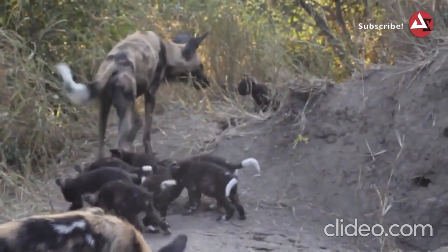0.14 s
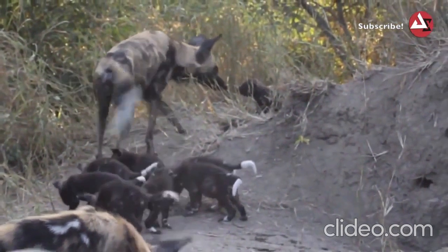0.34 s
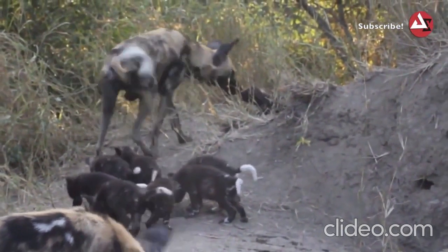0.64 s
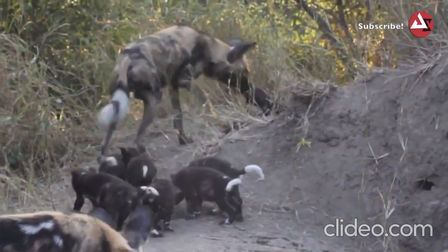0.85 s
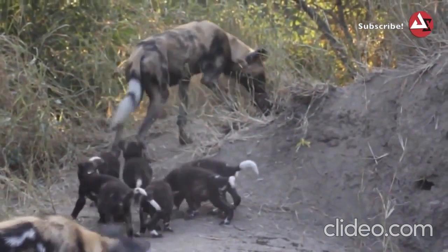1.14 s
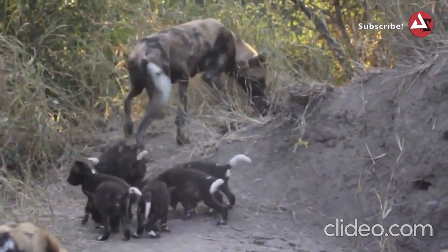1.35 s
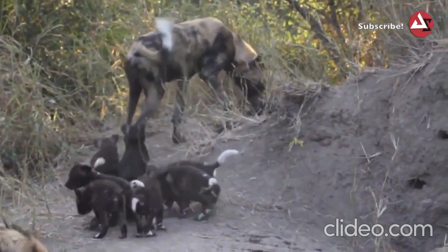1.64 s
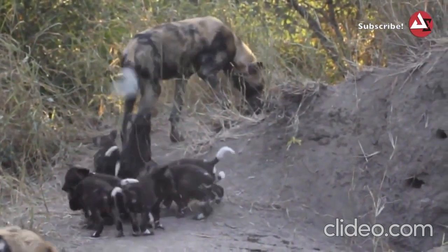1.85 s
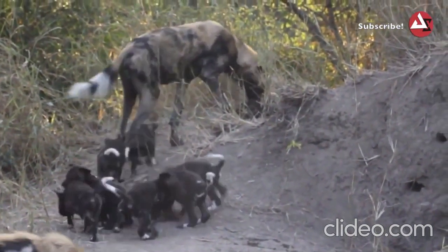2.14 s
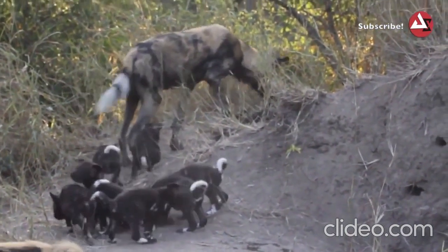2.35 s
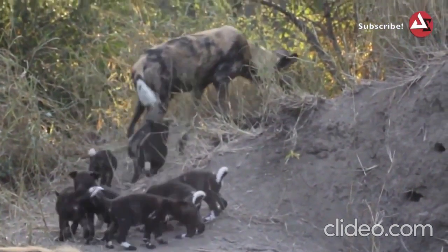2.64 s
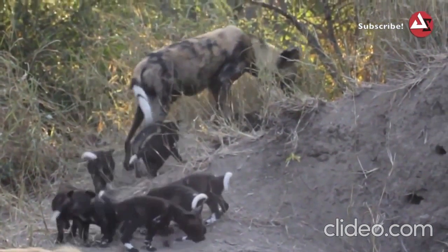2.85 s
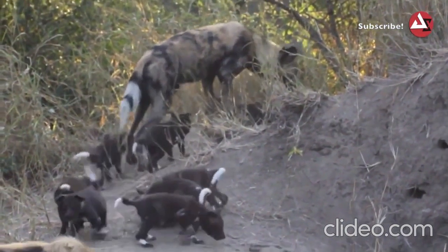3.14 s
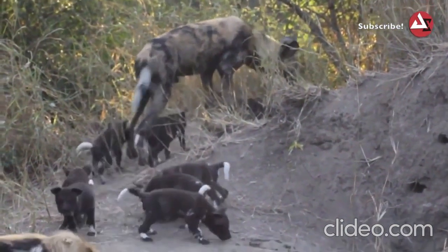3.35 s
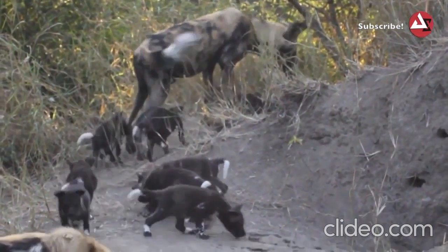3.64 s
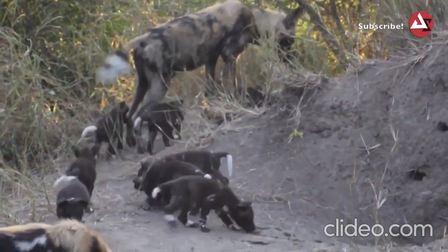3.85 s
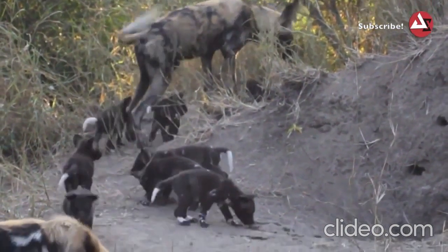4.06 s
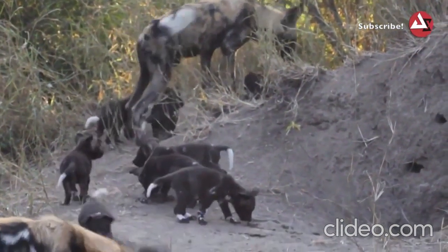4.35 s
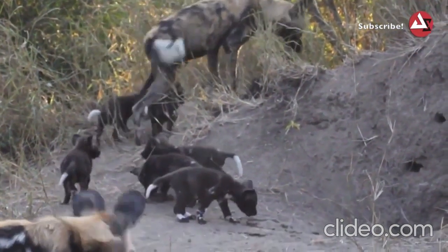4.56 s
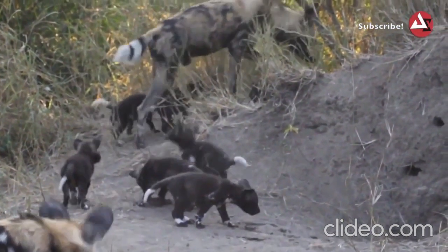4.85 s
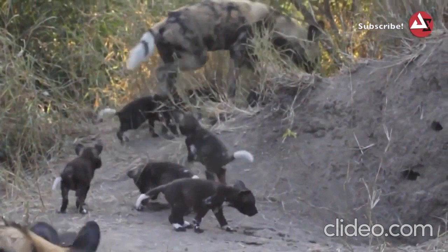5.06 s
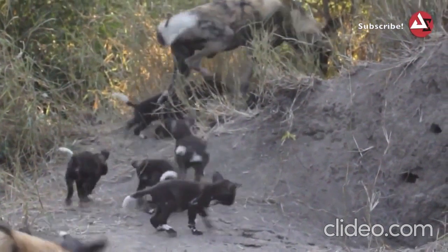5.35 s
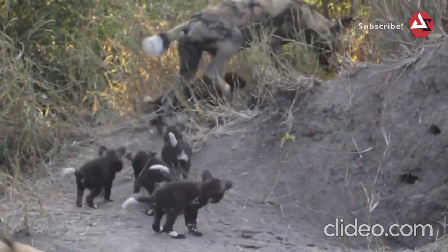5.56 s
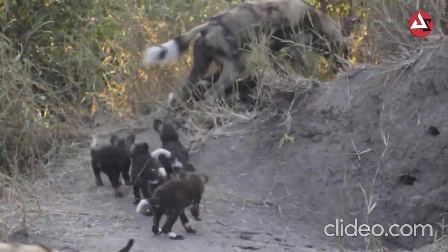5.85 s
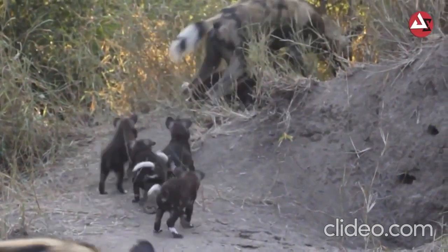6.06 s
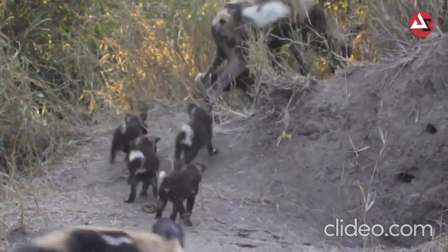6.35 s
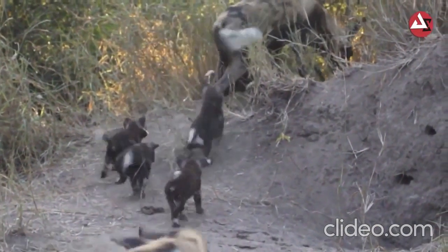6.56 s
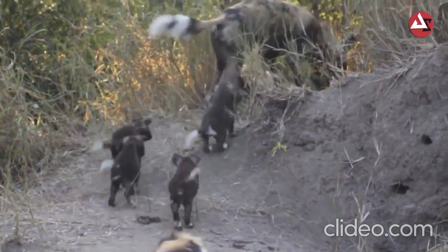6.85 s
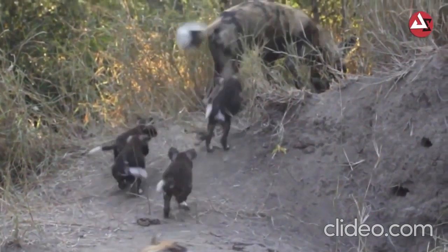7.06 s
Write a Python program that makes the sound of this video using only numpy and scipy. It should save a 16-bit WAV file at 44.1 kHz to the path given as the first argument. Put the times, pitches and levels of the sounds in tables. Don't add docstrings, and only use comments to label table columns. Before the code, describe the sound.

Bird-like squeaks and quick shrieks from pups echo briefly off an earth bank, among nearby shutter clacks, snapping twigs and soft rustling.

```python
import sys
import numpy as np
from scipy import signal
from scipy.fft import rfft, irfft, next_fast_len
from scipy.io import wavfile
from scipy.ndimage import uniform_filter1d, minimum_filter1d, map_coordinates

SR = 44100
rng = np.random.default_rng(int(sys.argv[2]) if len(sys.argv) > 2 else 0)


def invert_db(level):
    return 10 ** (np.asarray(level, dtype=float) / 20)


def store_pcm(level_fs):
    pcm = np.round(np.clip(level_fs, -1, 1) * 32767).astype(np.int16)
    wavfile.write(sys.argv[1], SR, np.atleast_2d(pcm).T)


N = 317828


def unit(x):
    return x / np.sqrt(np.mean(x ** 2) + 1e-20)


def along(points, hz):
    f, v = np.transpose(points)
    return np.interp(np.log(hz + 1), np.log(f + 1), v)


def wobble(n, rate):
    knots = rng.standard_normal(int(n * rate / SR) + 4)
    return map_coordinates(knots, [np.arange(n) * rate / SR])


def filtered(x, response):
    m = next_fast_len(x.shape[-1] + 8192)
    spectrum = rfft(x, m) * response(np.fft.rfftfreq(m, 1 / SR))
    return irfft(spectrum, m)[..., :x.shape[-1]]


def modes(table):
    def response(f):
        total = 0
        for k, (centre, width, db) in enumerate(table):
            total = total + (-1) ** k * invert_db(db) * 1j * f * width / (centre * centre - f * f + 1j * f * width)
        return total
    return response


def add(out, s, x):
    out[round(s * SR):][:len(x)] += x[:N - round(s * SR)]


def rush(spectrum, patchy_db, grit_db):
    gritty = rng.standard_normal(N) * invert_db(grit_db * wobble(N, 300))
    z = signal.stft(gritty, nperseg=512)[2]
    field = uniform_filter1d(rng.standard_normal(z.shape), 8, 0)
    field = uniform_filter1d(field, 14, 1)
    patchy = signal.istft(z * invert_db(patchy_db * unit(field)), nperseg=512)[1][:N]
    points = [(1, -120)] + list(spectrum) + [(22000, -120)]
    return unit(filtered(patchy, lambda hz: invert_db(along(points, hz))))


def arched(t, s, v):
    step = np.diff(v) / np.diff(s)
    inner = np.where(step[1:] * step[:-1] > 0, (step[1:] + step[:-1]) / 2, 0)
    slope = np.r_[step[0], inner, step[-1]]
    i = np.clip(np.searchsorted(s, t) - 1, 0, len(s) - 2)
    h = s[i + 1] - s[i]
    u = np.clip((t - s[i]) / h, 0, 1)
    ease = u * u * (3 - 2 * u)
    bend = h * u * (1 - u) * ((1 - u) * slope[i] - u * slope[i + 1])
    return v[i] + (v[i + 1] - v[i]) * ease + bend


def pitch_lines():
    # (time of the top [s], top pitch [Hz], length [s], level [dB], mouth opening [dB])
    twitters = [(0.541, 2824, 0.0496, -56.5, 6.5), (2.733, 2580, 0.083, -50, 5.5),
                (3.036, 2684, 0.095, -47.5, -6), (3.301, 2585, 0.0811, -43.5, -5),
                (6.483, 2706, 0.041, -44, 6)]
    # (pitch [Hz], level [dB])
    level_by_pitch = [(1300, -4), (1650, -3), (1950, 3.5), (2120, 1.5), (2290, -7), (2480, -1.5), (2700, 0)]
    # (time [s], pitch [Hz], level [dB])
    whines = [(-22, -45.5, [(0.205, 1650, -55), (0.215, 1643, -44), (0.242, 1680, -46), (0.275, 1283, -58),
              (0.31, 1217, -59.5), (0.42, 1166, -64), (0.49, 1000, -69)]), (-3, -40, [(2.04, 1560, -46),
              (2.07, 1595, -48), (2.09, 1766, -37.5), (2.11, 1930, -36.5), (2.14, 1720, -33.5),
              (2.17, 1715, -56)]), (-7.5, -21.5, [(2.085, 2104, -40), (2.105, 2395, -40.5),
              (2.15, 2170, -44.5)]), (13, -12, [(2.382, 1784, -48.5), (2.41, 1824, -48),
              (2.444, 1930, -51)]), (10.5, -2.5, [(3.777, 2470, -56), (3.782, 2480, -45.5),
              (3.795, 2397, -41), (3.803, 2170, -54)]), (14, -14, [(2.443, 2200, -58), (2.46, 2480, -60),
              (2.475, 2335, -59.5), (2.49, 2110, -55), (2.5, 2050, -64)]), (-15, -11, [(6.085, 1540, -64),
              (6.103, 1770, -48), (6.118, 2340, -61)])]
    # (time [s], pitch [Hz], level [dB], mouth opening [dB])
    yelps = [
        (-1, -20.5, -1, [(.718, 2100, -50, -8), (.727, 2107, -39.5, -5), (.734, 2243, -28, -10), (.741, 2342, -30, 0), (.757, 2477, -25, 2), (.775, 2297, -31, -2.5), (.794, 2160, -24, -8), (.81, 2116, -40.5, 6), (.895, 1987, -47.5, 0.5)]),
        (-5.5, -25, 0.5, [(1.705, 1597, -52, -7), (1.72, 1794, -36.5, -11), (1.735, 2105, -32.5, -2), (1.77, 1943, -34, 5), (1.79, 1950, -58, 2)]),
        (-30, -42, -6, [(3.62, 1760, -62.5, -7), (3.648, 1995, -51, -6), (3.654, 2190, -26.5, 9), (3.659, 2430, -16.5, 7), (3.663, 2500, -27.5, 7), (3.667, 2593, -11, -2), (3.677, 2614, -10.5, -2), (3.684, 2500, -17.5, 9), (3.688, 2380, -43.5, 12)]),
        (-4, -17, 1.5, [(3.688, 2365, -44.5, 7), (3.7, 1950, -41.5, 2), (3.712, 1497, -49.5, -8), (3.73, 1385, -45, 9), (3.748, 1550, -53, -8), (3.76, 2010, -39.5, -10), (3.776, 2400, -54, -5)]),
        (-2, -14, -3, [(3.803, 2100, -56, -8), (3.812, 1864, -38.5, -14), (3.822, 1710, -44, -9), (3.829, 1332, -47, -5), (3.86, 1235, -47, -1), (3.885, 1310, -48, 0), (3.906, 1402, -48, 1.5), (3.93, 1290, -48.5, -3), (3.957, 1160, -53, -12)]),
        (-1, -28, -2, [(4.372, 1650, -60, -23), (4.378, 1610, -38, -19), (4.394, 1630, -37.5, -9), (4.401, 1705, -32.5, 7), (4.405, 2190, -38.5, 10), (4.411, 2330, -34.5, 4.5), (4.424, 2490, -36.5, -6), (4.442, 2220, -40, -1), (4.46, 1980, -56, 6)]),
             (-7, -25, -4.5, [(1.962, 2290, -58, -12), (1.975, 2550, -44, -15), (1.99, 3020, -46, 2),
               (2.003, 2756, -26.5, 4.5), (2.015, 2364, -37.5, -5), (2.035, 2000, -63, 8)]),
               (-15, -19, 2, [(2.302, 1850, -59, -12), (2.311, 2184, -36, -1), (2.319, 2500, -28, -5),
               (2.333, 2848, -20, 0), (2.339, 2953, -32, 0), (2.348, 2853, -32, -3), (2.358, 2640, -26, 2),
               (2.366, 2400, -32, 8), (2.378, 1950, -46, 3)]), (-4, -25, -1, [(4.118, 1755, -61, 0),
               (4.128, 1904, -50, 0), (4.137, 1995, -43, 1), (4.147, 2360, -57, 3), (4.157, 2580, -41, -8),
               (4.17, 2316, -49, 4), (4.184, 1944, -57, 14), (4.198, 1680, -52.5, -12),
               (4.238, 1450, -60, -12)]), (-7, -30, 0.5, [(5.982, 2500, -54, 0), (6.002, 2780, -56.5, 3),
               (6.011, 2335, -49.5, -2), (6.018, 2120, -45, -3), (6.024, 1980, -61.5, 0)])]

    rise_share, round_top_s = 0.47, 0.0085
    for top_s, top_hz, length, db, mouth_db in twitters:
        u = np.arange(-rise_share * length, (1 - rise_share) * length, 1 / SR)
        sweep = np.where(u < 0, 36000, 48000)
        hz = top_hz - sweep * (np.hypot(u, round_top_s) - round_top_s)
        fade_db = 11 * np.linspace(-1, 1, len(u)) ** 4
        tiring_db = 87 * u
        level_db = db - fade_db - tiring_db + along(level_by_pitch, hz)
        yield top_s + u, hz, level_db, mouth_db, -21 + 0.568 * mouth_db, 0

    still = [(second_db, upper_db, 0, np.pad(rows, ((0, 0), (0, 1)))) for second_db, upper_db, rows in whines]
    for second_db, upper_db, echo_db, rows in still + yelps:
        s, pitch, db, mouth = np.transpose(rows)
        t = np.arange(round(s[0] * SR), round(s[-1] * SR)) / SR
        level_db = uniform_filter1d(np.interp(t, s, db), 120, mode="nearest")
        mouth_db = np.interp(t, s, mouth)
        yield t, arched(t, s, pitch), level_db, second_db + mouth_db, upper_db + mouth_db, echo_db


def chirps():
    # (frequency [Hz], level [dB])
    mouth = [(1200, 3), (1900, 2.5), (2300, -0.5), (2650, -1), (3000, -5)]
    # (frequency [Hz], level [dB])
    second = [(2400, -8.5), (2900, -5.5), (3450, -16), (3950, -8), (4350, -3.5), (4850, 1.2), (5400, -4),
              (6200, 2.5)]
    # (frequency [Hz], level [dB])
    throat = [(3500, -24), (4300, -12), (5300, 1), (7300, -2.5), (9000, -27), (11000, -23), (14000, -38)]
    # (frequency [Hz], density [dB per Hz])
    breath_colour = [(1500, -27), (2500, -3), (5000, 10), (9000, -15.5), (13000, 3.5)]

    out, toward_bank, effort = np.zeros((3, N))
    for t, hz, level_db, second_db, upper_db, echo_db in pitch_lines():
        n = len(t)
        weak = np.clip((-27.5 - level_db) / 12, 0, 1)
        level_db = level_db - 2 * weak * np.abs(wobble(n, 73.77)) ** 1.79
        first_db = level_db + along(mouth, hz)
        second_db = level_db + second_db + along(second, 2 * hz)
        cycles = np.cumsum(hz * (1 + 0.01037 * wobble(n, 401.0))) / SR
        glide = np.abs(np.gradient(hz) * SR)
        upper_db = level_db + upper_db - 0.00016 * glide
        levels = [first_db, second_db - 5e-5 * glide]
        levels += [upper_db + along(throat, k * hz) for k in range(3, 6)]
        voice = np.zeros(n)
        for k, db in enumerate(levels):
            flutter_db = (0.7 + 1.4 * weak + 1.0 * k) * wobble(n, 223)
            waver_db = 1.1 * k * wobble(n, 80.7)
            voice += invert_db(db + flutter_db + waver_db) * np.sin(2 * np.pi * (k + 1) * cycles)
        edge = np.clip(np.minimum(t - t[0], t[-1] - t) / 0.0028, 0, 1)
        add(out, t[0], np.sqrt(2) * edge * voice)
        add(toward_bank, t[0], invert_db(echo_db) * np.sqrt(2) * edge * voice)
        add(effort, t[0], edge * (invert_db(first_db) + invert_db(second_db)))
    breath = invert_db(-30) * effort * rush(breath_colour, patchy_db=4, grit_db=4)
    return out + breath, toward_bank + breath


def whistles():
    # (start [s], length [s], first pitch [Hz], last pitch [Hz], rms [dB])
    thin = [(1.109, 0.08, 4223, 3800, -61), (1.444, 0.13, 1950, 1720, -60.5), (2.079, 0.1, 8720, 8530, -56),
            (2.144, 0.063, 4983, 5200, -58), (2.384, .036, 7240, 7270, -53),
            (4.236, .016, 6550, 6500, -57.5), (3.045, 0.075, 10980, 11060, -44.5),
            (3.135, 0.075, 6620, 6770, -58.5), (4.869, 0.042, 4290, 4530, -48.5),
            (5.098, 0.0477, 6420, 6150, -55), (5.518, 0.038, 4463, 4300, -53)]
    hoarse = [(.735, 0.1, 10700, 10440, -54.5), (1.373, 0.148, 12440, 12130, -58),
              (2.232, 0.074, 9500, 9700, -56.5), (2.99, 0.2, 10300, 9309, -56.5),
              (3.583, 0.16, 9140, 11300, -49), (3.703, 0.0655, 10100, 10060, -49.5),
              (3.778, 0.024, 10490, 8250, -37), (3.838, 0.16, 9220, 10530, -49),
              (5.033, 0.095, 9370, 9400, -53.5), (6.78, 0.212, 12300, 11700, -58)]

    out = np.zeros(N)
    for calls, blur_hz in [(thin, 58.4), (hoarse, 1000)]:
        for s, length, hz0, hz1, db in calls:
            n = round(length * SR)
            cycles = np.cumsum(np.linspace(hz0, hz1, n)) / SR
            smear = wobble(n, blur_hz) + 1j * wobble(n, blur_hz) + 150 / blur_hz
            tone = unit(np.real(smear * np.exp(2j * np.pi * cycles)))
            swell = signal.windows.tukey(n, 0.4) * invert_db(np.linspace(3, -6, n))
            add(out, s, invert_db(db) * swell * tone)
    return out


def cameras():
    # (centre [Hz], width [Hz], level [dB])
    housing = [(920, 196, 3.5), (1950, 470, 4.5), (3800, 1560, -5)]
    # (centre [Hz], width [Hz], level [dB])
    blades = [(5100, 5100, 1.5), (8270, 1900, 10.5), (10600, 930, 10.5), (13128, 3170, 1.5)]
    # (time after the first [s], body [dB], hiss [dB], rise [s], t60 [s])
    near_cycle = [(0, -36, -37, 0.0018, 0.049), (0.0185, -31.5, -44.5, 0.001849, 0.033),
                  (.063, -43.5, -42.5, .006, 0.076), (.107, -26.5, -28.5, .0016, .032),
                  (0.1253, -44.5, -42, .011, 0.058)]
    far_cycle = [(0, -45.5, -45, 0.011, 0.052), (0.0108, -43.5, -50.5, .008, 0.036),
                 (0.099, -38.5, -38, .006, 0.053), (.157, -47, -44.5, .014, 0.049),
                 (.1678, -44, -35, .005, .035), (.206, -50.5, -48.5, .012, 0.037)]
    # (time [s], level [dB], extra hiss [dB])
    near_shots = [(0.9586, -1.5, 0.2), (1.611, -0.1, -0.36)]
    far_shots = [(3.3353, 0.9, -5.5), (5.5668, 0.5, -4.5), (6.4342, 0.3, -7)]
    # (time [s], body [dB], hiss [dB], rise [s], t60 [s])
    stray_blows = [(5.5222, -55, -53, 0.0093, 0.097), (6.1866, -47, -66, 0.0041, 0.24),
                   (7.033, -50.5, -47, .004, 0.043)]
    # (time [s], peak [dB], ring [Hz])
    ticks = [(1.8054, -27.5, 2580), (2.8719, -46, 1800), (3.3764, -38.5, 2100), (4.399, -42, 3100),
             (4.9486, -52, 2200), (5.575, -34, 2100), (5.708, -37, 2100), (5.7693, -50, 2100),
             (6.5861, -39, 2200)]
    # (time [s], peak [dB], ring [Hz])
    dial = [(6.6076, -37, 1810), (6.6134, -33, 2000), (6.6169, -32, 2060), (6.6246, -47, 2290),
            (6.6317, -37, 2040), (6.6424, -35, 2110), (6.658, -33, 2010), (6.6777, -32, 2000),
            (6.6985, -33, 2030), (6.7203, -37, 1870), (6.7248, -36, 1840), (6.7302, -38, 2090),
            (6.7379, -43, 3190), (6.7434, -43, 1680), (6.749, -45, 1550), (6.7574, -44, 3100),
            (6.765, -50, 1480), (6.8535, -27, 2350)]

    blows = []
    for shots, cycle in [(near_shots, near_cycle), (far_shots, far_cycle)]:
        for s, db, bright_db in shots:
            for lag, body_db, hiss_db, rise, t60 in cycle:
                blows.append((s + lag, db + body_db, db + bright_db + hiss_db, rise, t60))

    low, high, snap = np.zeros((3, N))
    t = np.arange(SR // 8) / SR
    for s, body_db, hiss_db, rise, t60 in blows + stray_blows:
        shape = np.where(t < rise, (t / rise) ** 0.5, invert_db(-60 * (t - rise) / t60))
        rattle = shape * rng.standard_normal((2, len(t))) * invert_db(2.61 * wobble(len(t), 500.4))
        rattle = rattle * np.linalg.norm(shape) / np.linalg.norm(rattle, axis=1, keepdims=True)
        add(low, s - rise, invert_db(body_db + 8.5) * rattle[0])
        add(high, s - rise, invert_db(hiss_db - 3.5) * rattle[1])

    for s, db, hz in ticks + dial:
        burst = invert_db(-60 * t / 0.004) * (1 - np.exp(-t / 0.00013)) * rng.standard_normal(len(t))
        overtone = np.sin(2 * np.pi * (1.6 * hz * t + rng.random()))
        ring = np.sin(2 * np.pi * hz * t) + invert_db(-4.5) * overtone
        add(snap, s, invert_db(db + 2.5 - 60 * t / 0.0053) * (1 - np.exp(-t / 0.00019)) * ring)
        add(high, s, invert_db(db - 1) * burst / np.linalg.norm(burst))
    return filtered(low, modes(housing)) + filtered(high, modes(blades)) + snap


def bumps():
    # (time [s], peak [dB], pitch [Hz], t60 [s])
    knocks = [(1.515, -22, 315.5, 0.0235), (2.321, -54, 110.1, 0.15), (3.118, -50, 158, 0.14),
              (3.66, -50, 100.8, 0.12), (3.77, -41, 223.6, 0.039), (4, -44, 146, 0.034),
              (4.866, -45.5, 148.2, 0.08), (5.142, -37.5, 392, 0.019), (6.182, -47, 177, 0.11),
              (7.082, -56, 437, 0.058)]

    out, t = np.zeros(N), np.arange(SR // 5) / SR
    for s, db, hz, t60 in knocks:
        swing = np.sin(2 * np.pi * hz * t)
        swing += 0.183 * np.sin(2 * np.pi * 2.2 * hz * t)
        swing += 0.25 * np.sin(2 * np.pi * 0.62 * hz * t)
        add(out, s, invert_db(db + 1.5 - 60 * t / t60) * swing * (1 - np.exp(-t / 0.00078)))
    return filtered(out, lambda hz: (1j * hz / (90 + 1j * hz)) ** 2)


def bank(x):
    # (frequency [Hz], t60 [s])
    decay = [(500, 0.9), (2500, 0.33), (5500, 0.402), (12000, 0.153)]

    hz, t, z = signal.stft(rng.standard_normal(SR // 2), SR, nperseg=256)
    late = invert_db(-60 * t / along(decay, hz)[:, None])
    early = invert_db(-2.5 - 60 * t / 0.078)
    tail = signal.istft(z * (late + early), SR, nperseg=256)[1]
    delayed = np.pad(x, (300, 0))
    return signal.fftconvolve(delayed, tail / np.linalg.norm(tail))[:N]


def bush():
    # (frequency [Hz], density [dB per Hz])
    hum = [(20, -32.5), (45, -14.5), (100, -15.5), (170, -7.5), (270, -1.5), (350, -1.5), (550, -5),
           (637, -4), (715, -13.5), (800, -0.5), (890, -16.5), (1680, -6), (1940, -22), (2800, -51.5)]
    # (frequency [Hz], density [dB per Hz])
    paws = [(700, 6.5), (1000, -21.5), (1700, 3), (2600, 4), (3500, 0.5), (4500, -15.5)]
    # (frequency [Hz], density [dB per Hz])
    grass = [(2500, -27.5), (3800, -0.5), (5500, -4), (8000, -6), (10000, -37.5)]
    # (frequency [Hz], density [dB per Hz])
    fine_hiss = [(6500, -11), (8500, -4), (10500, -6), (12500, -2.5), (14000, -12)]
    # (time [s], level [dB])
    stirring = [(0, -66.5), (.3, -62.5), (1.3, -63.5), (2.7, -61.5), (3.5, -68.5), (4.2, -96), (4.7, -57.5),
                (5.15, -58), (5.45, -54.5), (5.9, -61), (7.21, -63)]
    # (time of the peak [s], paws [dB], grass over paws [dB], t60 [s])
    scuffles = [(.74, -64, -4.5, 0.53), (1.07, -46.5, -5, 0.54), (1.7, -49.5, -10, 1.1),
                (2.12, -51, -2.5, 0.36), (2.36, -49, 3, 0.85), (3.07, -66, 11.5, 2.12),
                (3.34, -49, -0.5, 0.5), (3.681, -48.5, 2, 1.9), (4.16, -56, 0, 2.2), (4.429, -58, 8.5, 1),
                (5.6, -47.5, -5, 0.555), (6.179, -55.5, 3.5, 0.23), (6.46, -49, -3, 0.79),
                (6.64, -53, 0.5, 0.65), (6.83, -52, -7.5, 1.9)]

    t = np.arange(N) / SR
    calm = invert_db(np.interp(t, *np.transpose(stirring))) ** 2
    paws_power = calm
    grass_power = calm * invert_db(1.55) ** 2
    for s, db, over_db, t60 in scuffles:
        away = np.where(t < s, (s - t) / 0.29, (t - s) / t60)
        burst = invert_db(db - 60 * away) ** 2
        paws_power = paws_power + burst
        grass_power = grass_power + burst * invert_db(over_db) ** 2
    paws_db, grass_db = 10 * np.log10(paws_power), 10 * np.log10(grass_power)
    stir = wobble(N, 13)
    x = invert_db(-57 + 1.4 * wobble(N, 8.7)) * rush(hum, patchy_db=1.85, grit_db=1.5)
    x += invert_db(paws_db - 4.0 + 2.12 * stir) * rush(paws, patchy_db=2.2, grit_db=0.5)
    x += invert_db(grass_db - 7.5 + 1.565 * stir) * rush(grass, patchy_db=-0.8, grit_db=1.5)
    return x + invert_db(grass_db - 2.0 + 0.233 * stir) * rush(fine_hiss, patchy_db=1.8, grit_db=1.5)


def scene():
    # (frequency [Hz], level [dB])
    bank_colour = [(1200, -12.5), (2000, -0.5), (2800, 0.5), (5000, 0.5), (9000, 3)]
    # (frequency [Hz], side minus mid [dB])
    width = [(4100, -51), (4500, -7.5), (7000, -6), (13000, 4)]

    voices, toward_bank = chirps()
    thin = whistles()
    near = cameras()
    around = bush()
    calls = filtered(toward_bank + thin, lambda hz: invert_db(along(bank_colour, hz)))
    echo = invert_db(-9.5) * bank(calls) + invert_db(-11.0) * bank(near)
    mid = voices + thin + near + echo + bumps() + around
    z = signal.stft(around + 0.081 * echo + 0.2 * near, nperseg=256)[2]
    other = signal.istft(z * np.exp(2j * np.pi * rng.random(z.shape)), nperseg=256)[1][:N]
    side = filtered(other, lambda hz: invert_db(along(width, hz) + 7.0))
    return np.array([mid + side, mid - side])


def top_cut(x):
    return signal.sosfilt(signal.butter(12, 14060, fs=SR, output="sos"), x)


def record(dry):
    mid, side = (dry[0] + dry[1]) / 2, (dry[0] - dry[1]) / 2

    z = signal.stft(mid, nperseg=1024)[2]
    power = (np.abs(z[:-1]) ** 2).reshape(64, 8, -1).sum(axis=1)
    loudest_near = -minimum_filter1d(-power, size=5, axis=0)
    kept = power > loudest_near * invert_db(-31) ** 2
    kept[:8] = True
    mid = signal.istft(z * np.r_[kept.repeat(8, axis=0), kept[:1]], nperseg=1024)[1][:N]

    hz, t, z = signal.stft(side, SR, nperseg=1024)
    edge_hz = 8800 + 1300 * wobble(N, 2.94)[::512] + 1100 * wobble(N, 20)[::512]
    edge_hz = np.pad(edge_hz, (0, len(t)), mode="edge")[:len(t)]
    luck = rng.random((32, len(t) // 2 + 1)).repeat(2, axis=1)
    luck = luck[(hz // 700).astype(int), :len(t)]
    chance = np.where(hz[:, None] < edge_hz, 0.8, 0.05)
    side = signal.istft(z * (luck < chance), SR, nperseg=1024)[1][:N]

    stereo = np.array([mid + side, mid - side])
    mix = filtered(stereo, lambda hz: np.where(hz < 13150, 1, invert_db(-33) * (hz < 15500)))
    return top_cut(mix)


dry = scene()
out = record(dry)
store_pcm(out)
```